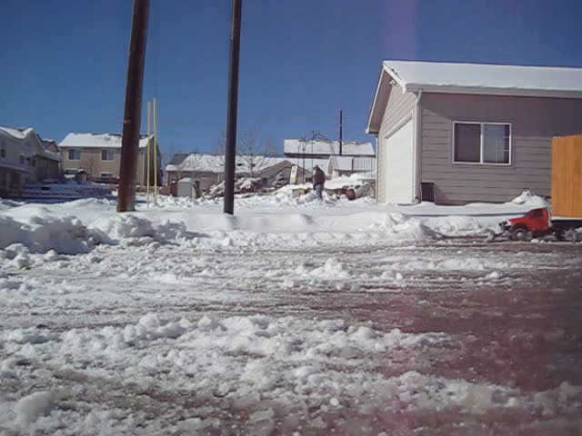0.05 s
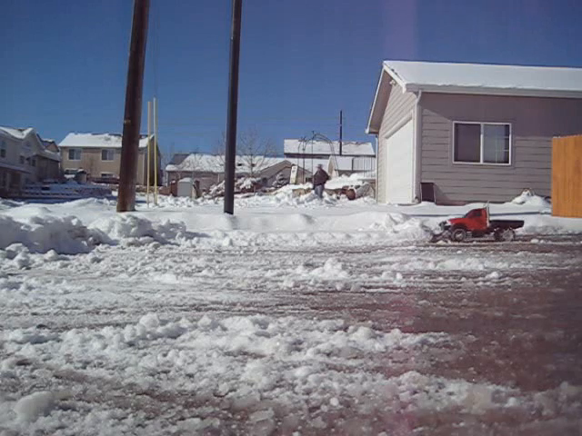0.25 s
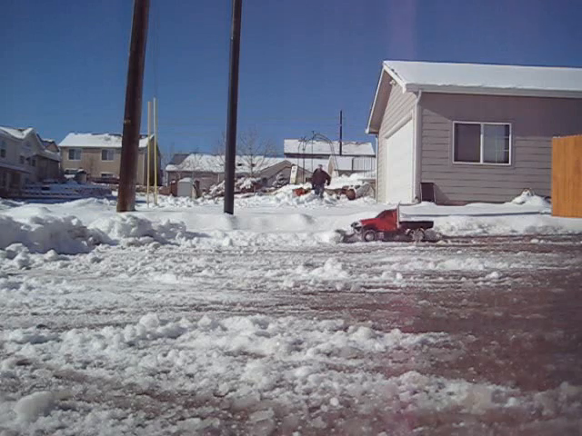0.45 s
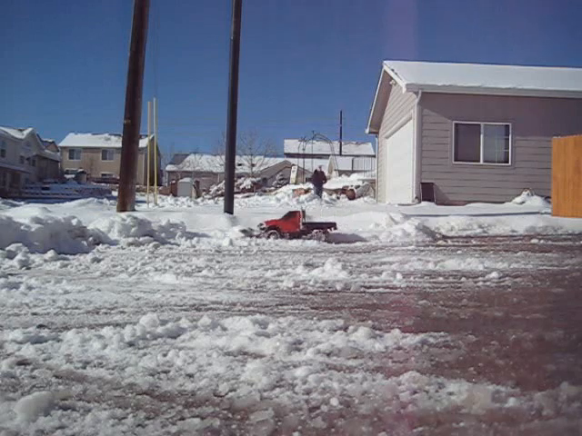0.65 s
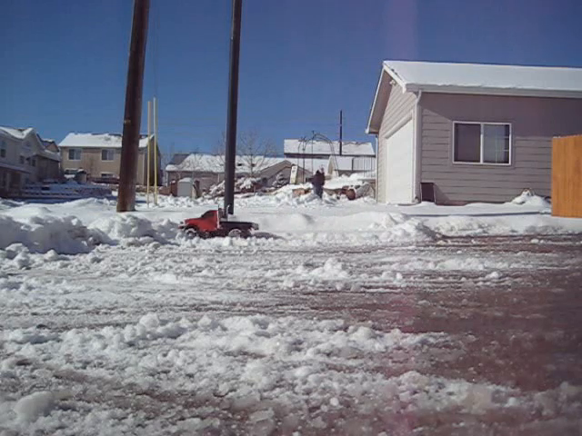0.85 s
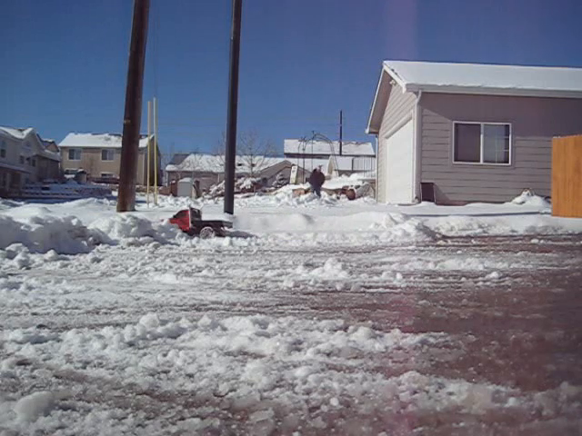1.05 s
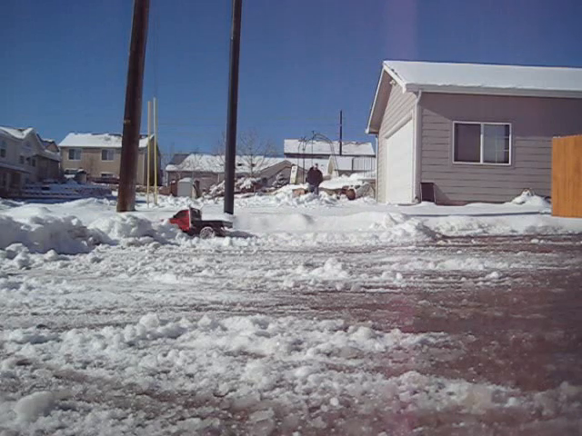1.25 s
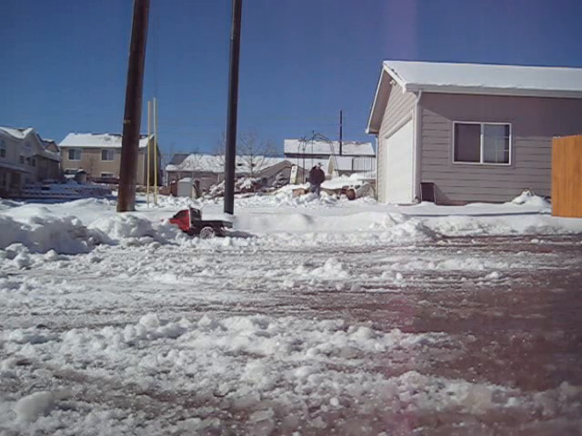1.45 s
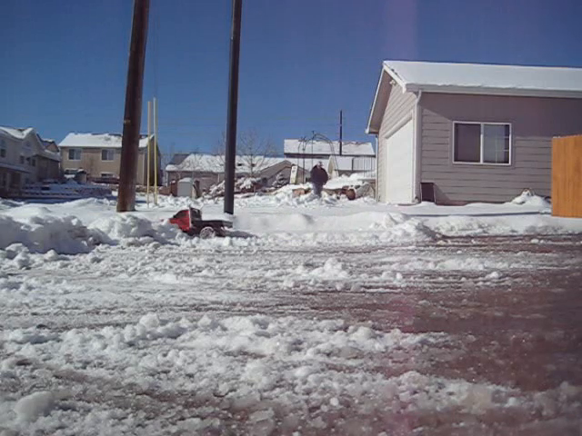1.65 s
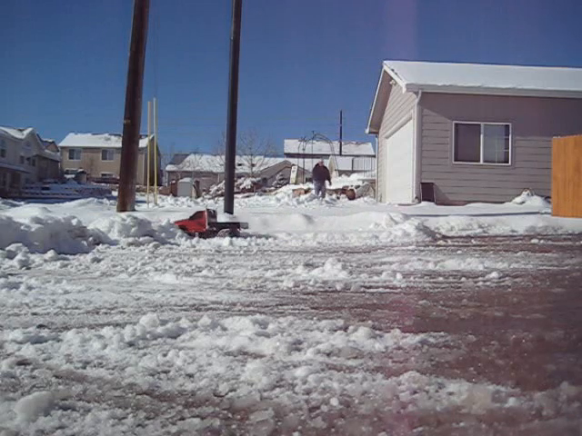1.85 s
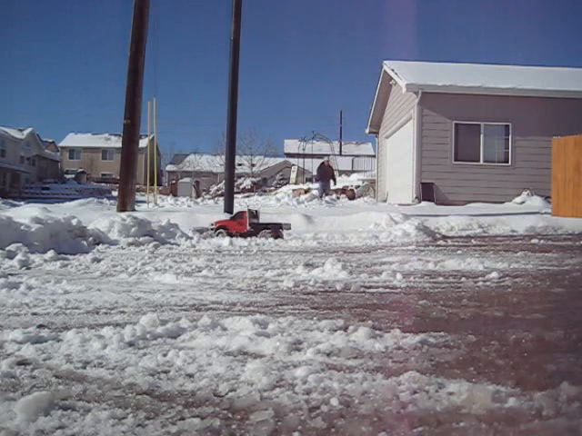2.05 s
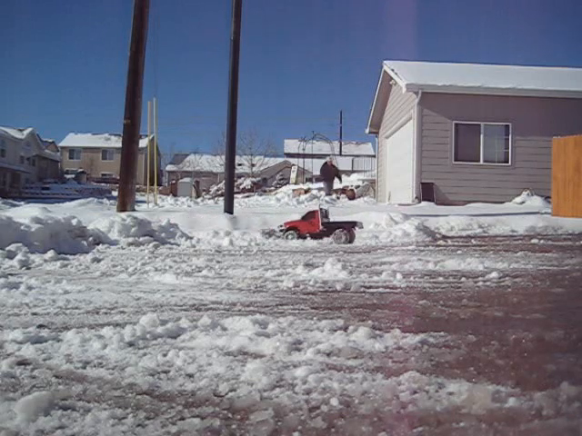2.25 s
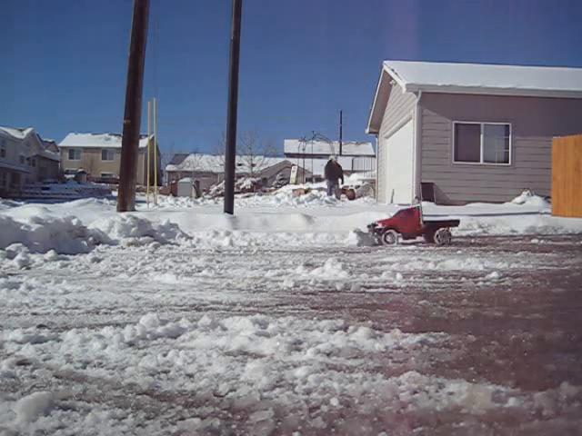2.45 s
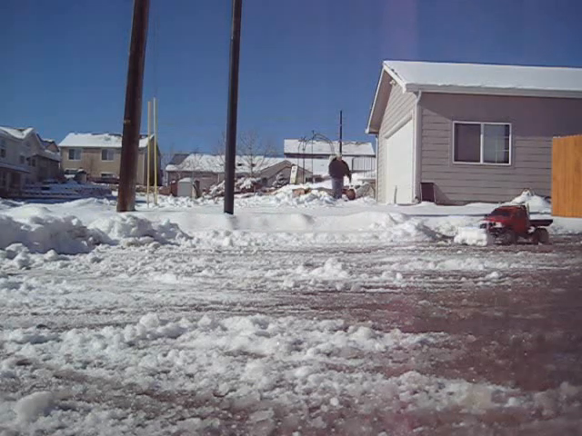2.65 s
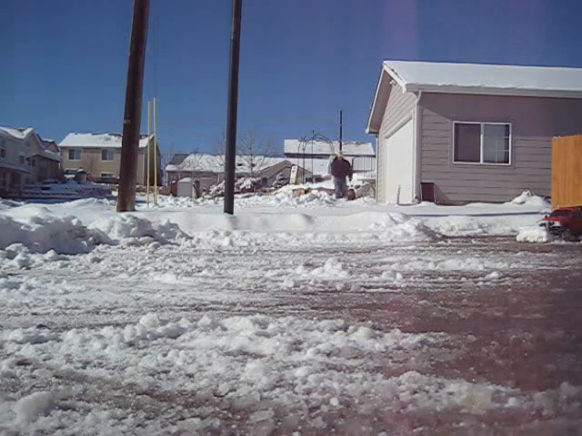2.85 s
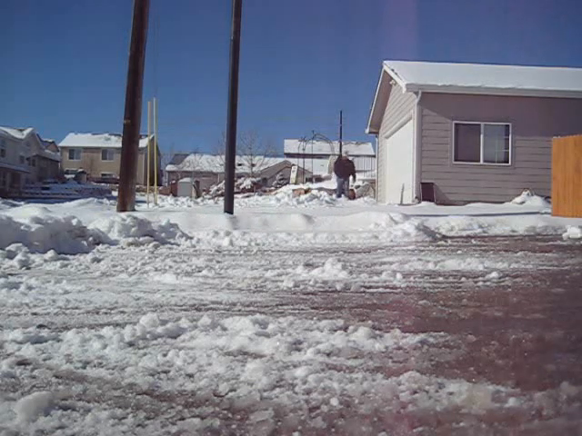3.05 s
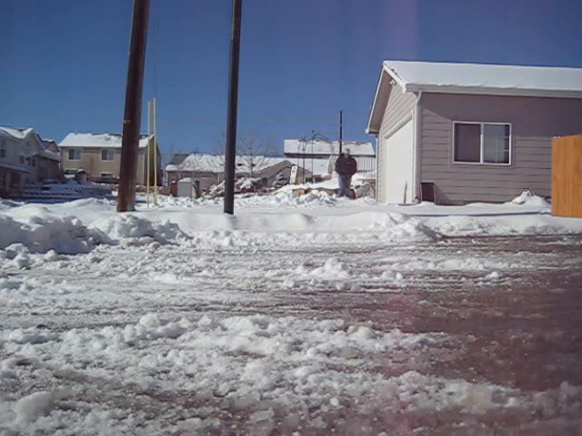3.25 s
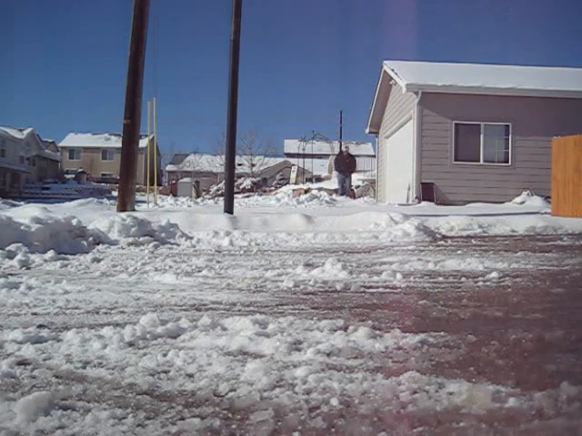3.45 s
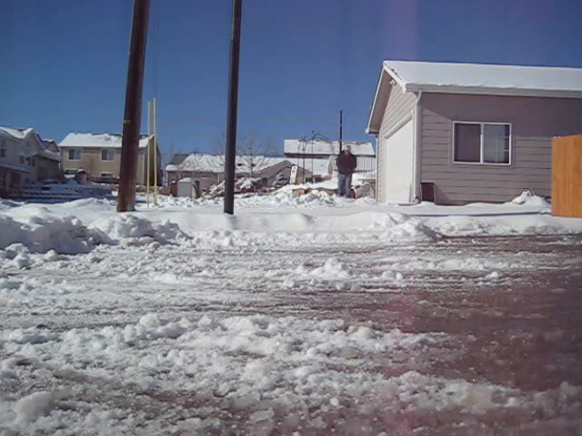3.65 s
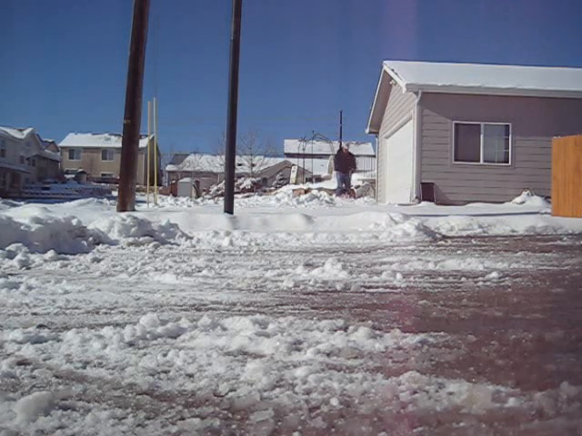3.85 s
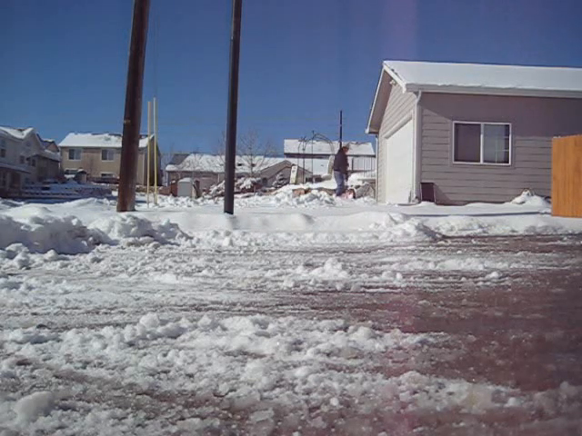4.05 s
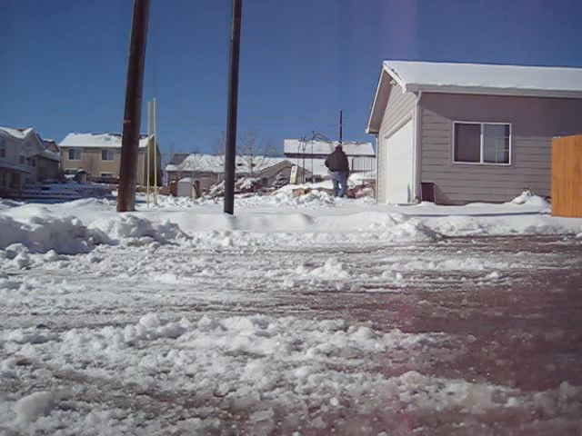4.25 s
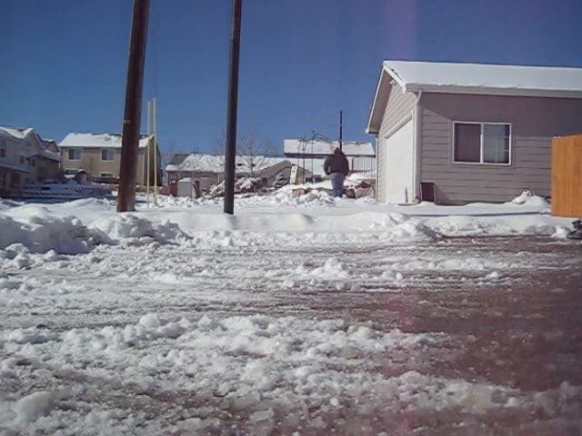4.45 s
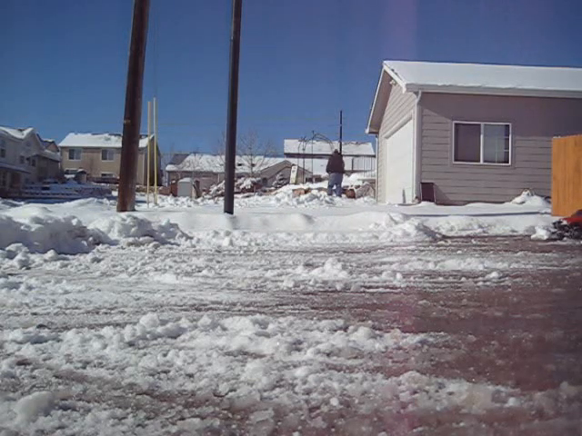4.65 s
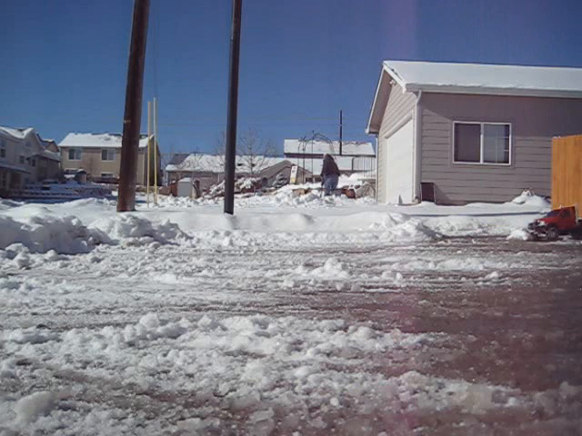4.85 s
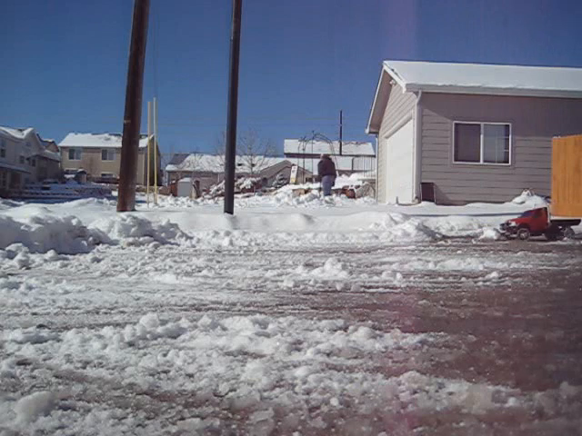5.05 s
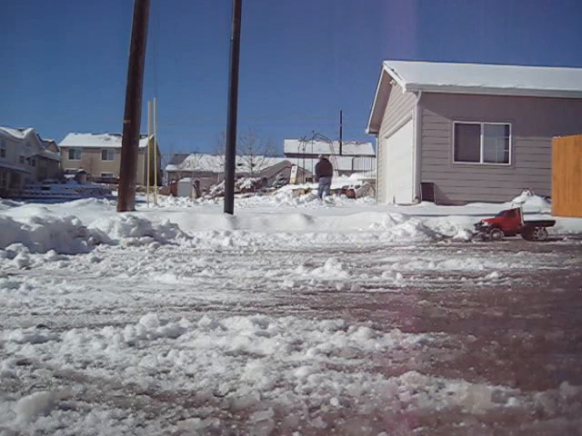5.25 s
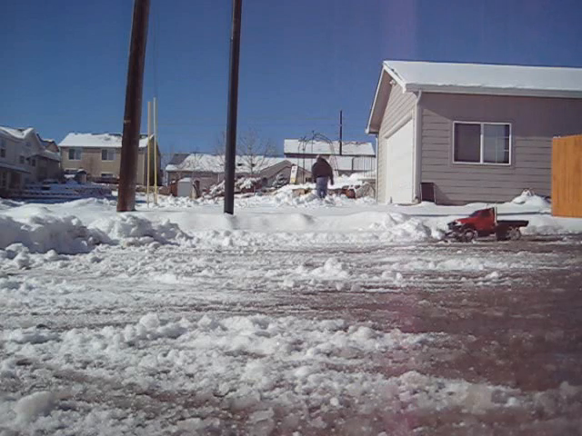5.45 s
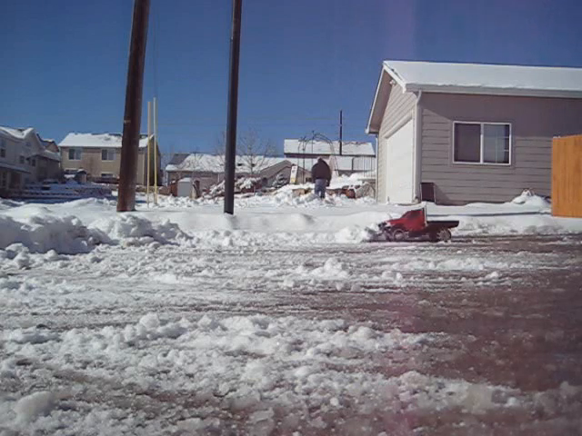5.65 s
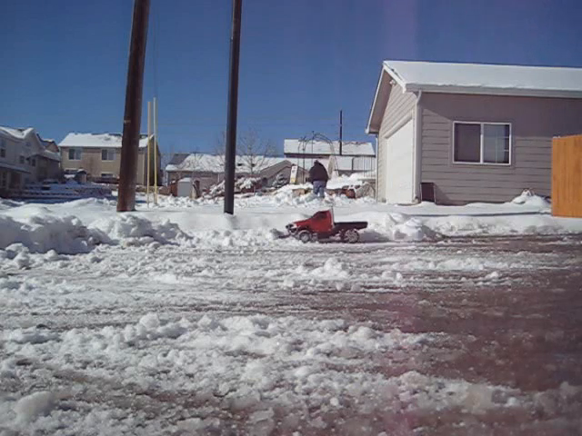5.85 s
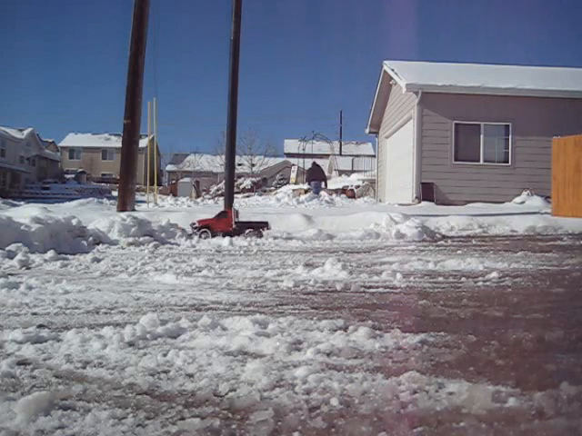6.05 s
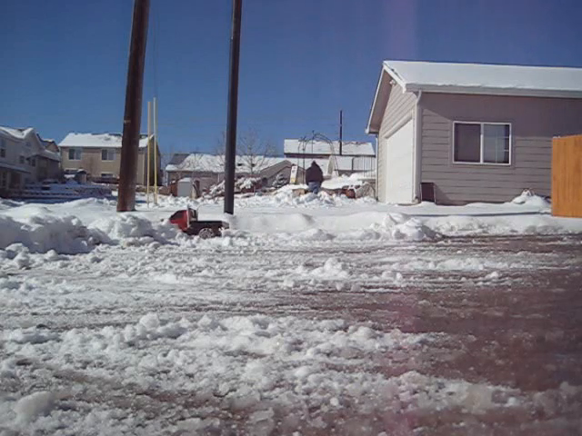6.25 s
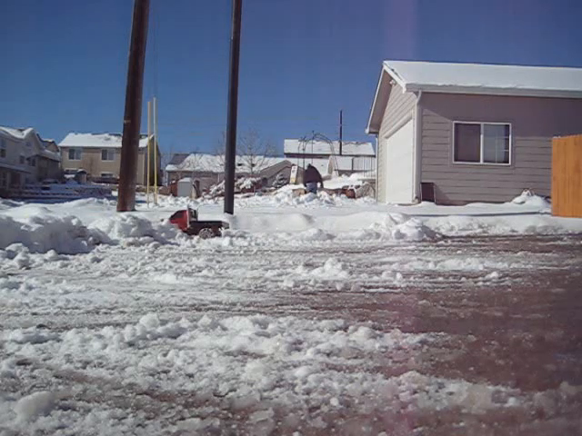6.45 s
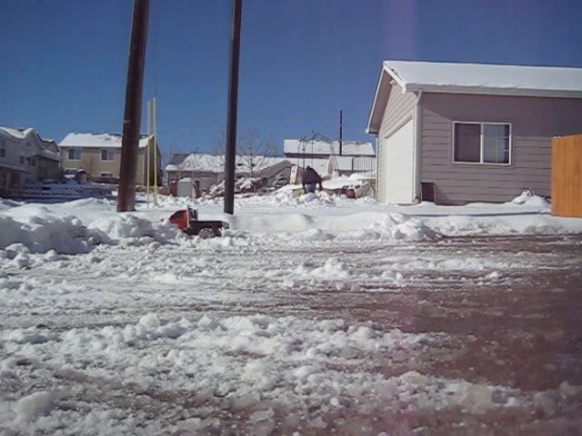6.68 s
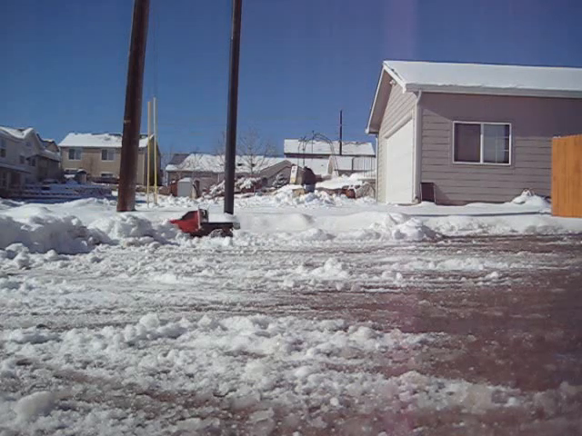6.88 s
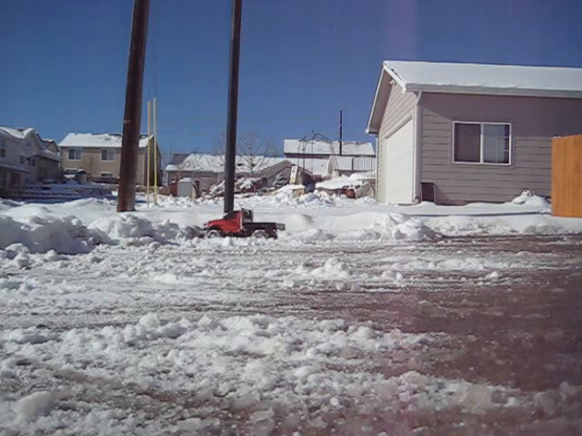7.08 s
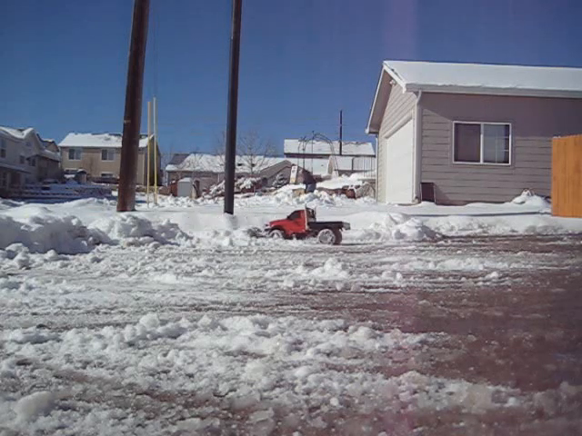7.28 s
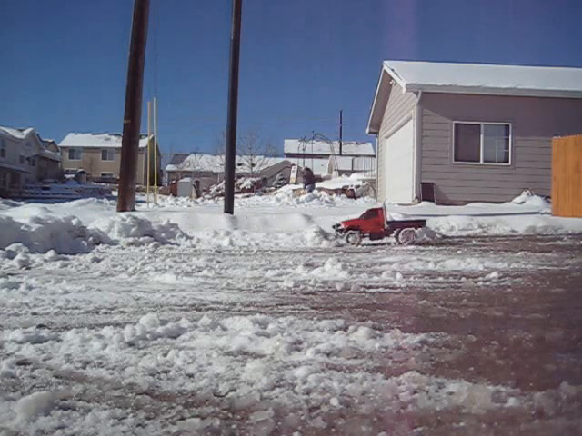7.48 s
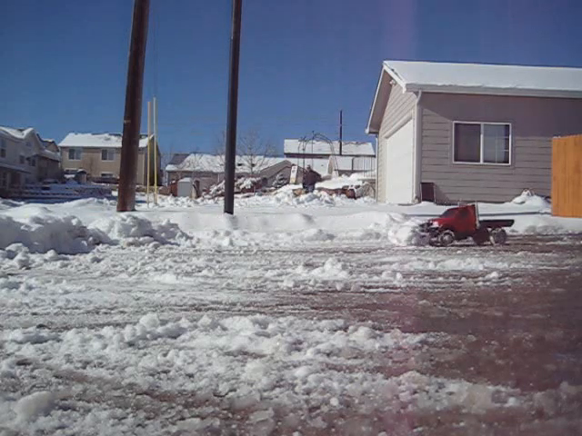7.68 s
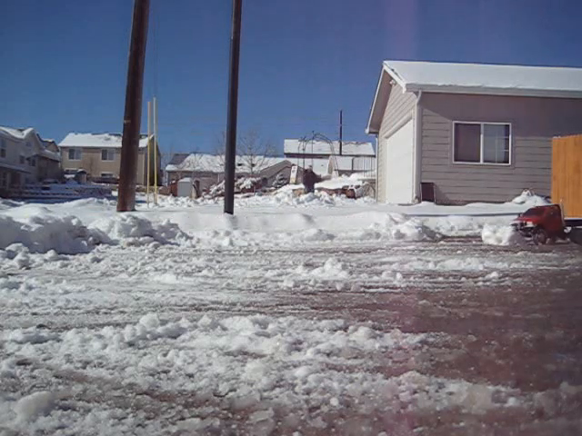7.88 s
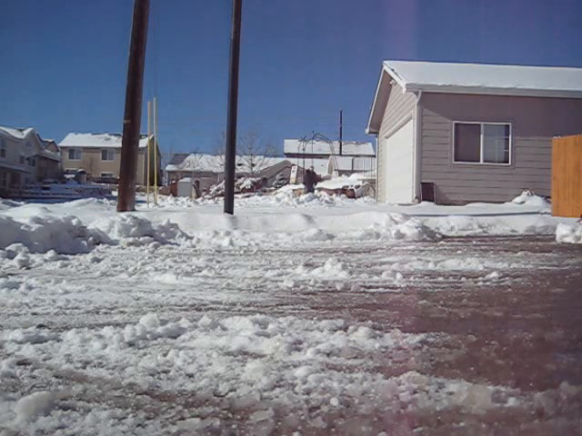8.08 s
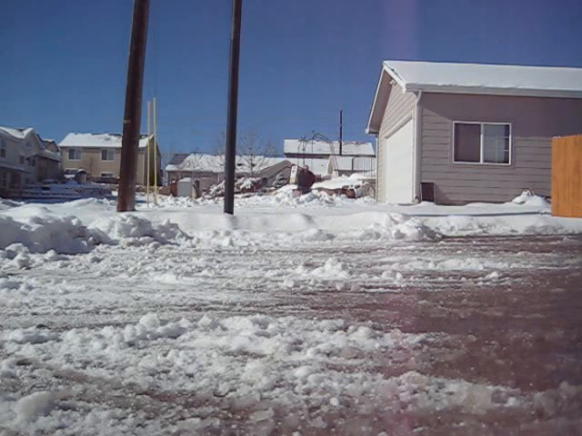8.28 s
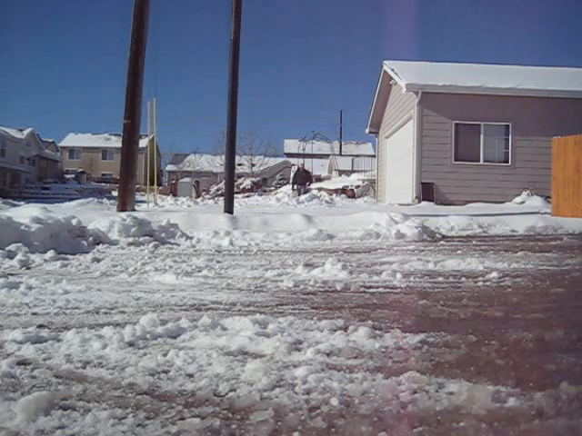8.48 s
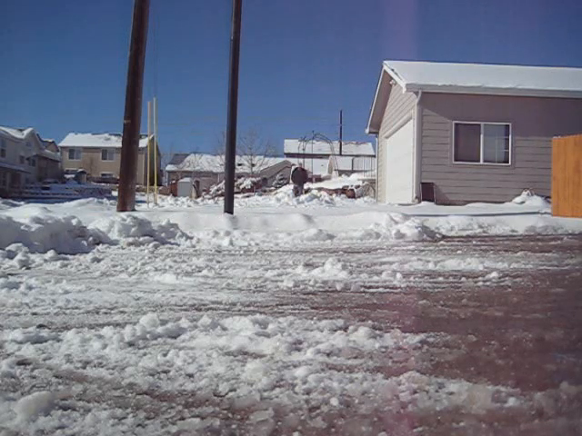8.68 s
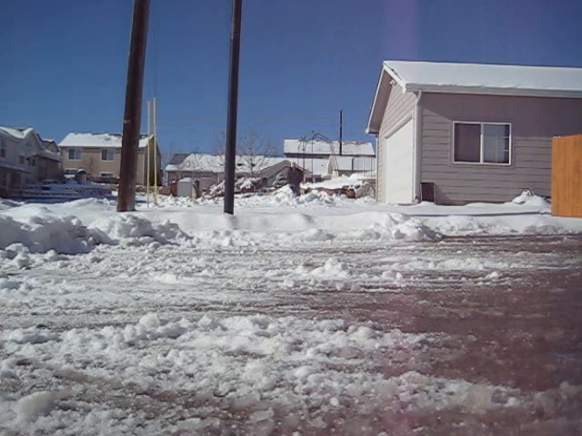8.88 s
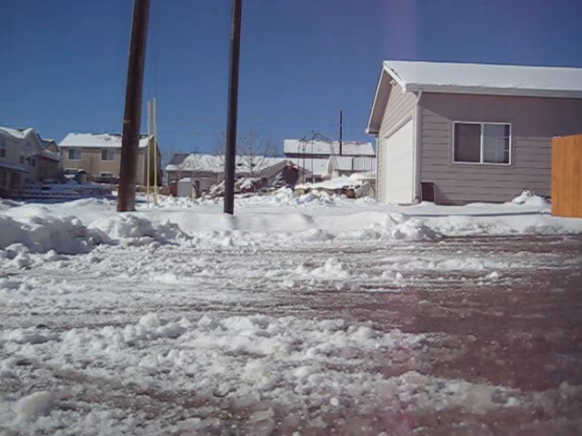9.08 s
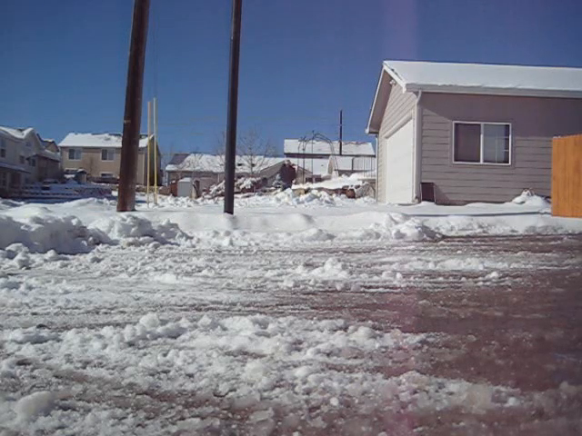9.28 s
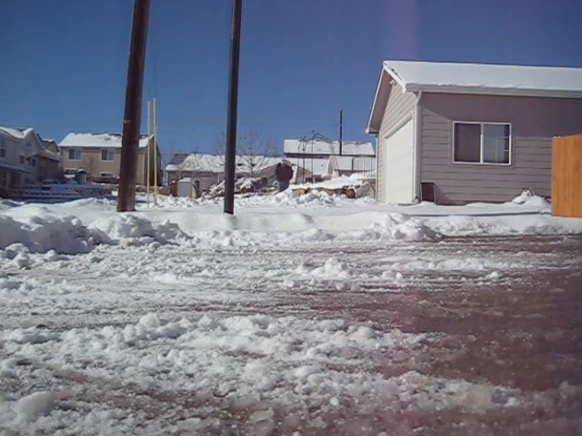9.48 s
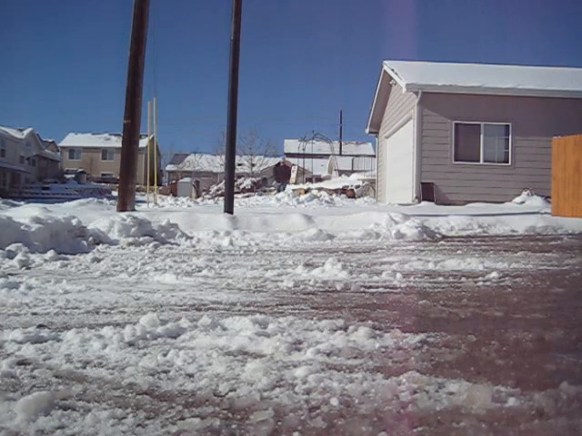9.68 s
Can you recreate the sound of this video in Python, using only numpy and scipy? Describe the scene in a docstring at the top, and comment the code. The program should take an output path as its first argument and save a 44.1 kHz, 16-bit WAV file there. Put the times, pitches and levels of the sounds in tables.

```python
"""One microphone in a yard, feeding both channels: a small electric model truck ploughs snow.
It drives from the garage to the snow bank, rests and reverses home, shuffles in short jerks close by,
then goes out and back again. Gear teeth rattle into the chassis; motor and gears whine with the speed.
Snow creaks in bursts of grain slips, ice and plastic tick as short noise puffs, slack gears clack.
Far traffic rumbles and drones throughout under shaped noise and microphone hiss."""
import sys
import numpy as np
from scipy import signal
from scipy.fft import rfft, irfft, next_fast_len
from scipy.io import wavfile
from scipy.ndimage import uniform_filter1d

SR = 44100
rng = np.random.default_rng(int(sys.argv[2]) if len(sys.argv) > 2 else 0)


def waveform_to_disk(signal):
    """Save audio, clipped to [-1, 1], as 16-bit WAV at the path in sys.argv[1]."""
    frames = np.transpose(np.atleast_2d(signal))
    scaled = np.clip(frames, -1, 1) * 32767
    samples = np.round(scaled).astype(np.int16)
    wavfile.write(sys.argv[1], SR, samples)


def voltage_ratio(decibels):
    """Convert decibels (scalar or array-like) to amplitude ratios, 20 dB per decade."""
    exponent = np.asarray(decibels, float) / 20
    return 10 ** exponent


N = 428641


def rms_one(x):
    """Scales to an rms of 1."""
    return x / np.sqrt(np.mean(x ** 2) + 1e-20)


def in_time(rows):
    """Straight lines through rows of time in seconds and values, one curve a column."""
    s, *columns = np.transpose(rows)
    return [np.interp(np.arange(N) / SR, s, column) for column in columns]


def at_hz(points, hz):
    """Reads a table of Hz and dB along log frequency."""
    table_hz, table_db = np.transpose(points)
    return np.interp(np.log(hz), np.log(table_hz), table_db)


def band(x, low, high, order=2):
    """Butterworth band-pass between two frequencies in Hz."""
    return signal.sosfilt(signal.butter(order, [low, high], "band", fs=SR, output="sos"), x)


def coloured(spectrum):
    """Smooth noise on a spectrum; rms 1."""
    size = next_fast_len(N)
    hz = np.maximum(np.fft.rfftfreq(size, 1 / SR), 1)
    colour = voltage_ratio(at_hz(spectrum, hz))
    return rms_one(irfft(rfft(rng.standard_normal(size)) * colour, size)[:N])


def drift(rate):
    """Slow chance: noise twice through a one-pole low-pass at rate Hz, run in for a second; rms 1."""
    r = np.exp(-2 * np.pi * rate / SR)
    noise = rng.standard_normal(N + SR)
    return rms_one(signal.lfilter([1], [1, -2 * r, r * r], noise)[SR:])


def resonances(x, table):
    """Parallel resonators of (Hz, width Hz, dB), signs alternating."""
    out = 0
    for k, (hz, width, level_db) in enumerate(table):
        r = np.exp(-np.pi * width / SR)
        top = (-1) ** k * voltage_ratio(level_db) * (1 - r * r) / 2
        out = out + signal.lfilter([top, 0, -top], [1, -2 * r * np.cos(2 * np.pi * hz / SR), r * r], x)
    return out


def grains(per_s, spread_db):
    """Random clicks of uneven size and sign."""
    sizes_db = spread_db * np.minimum(rng.exponential(1, N), 5)
    sizes = voltage_ratio(sizes_db) * rng.choice([-1, 1], N)
    return sizes * (rng.random(N) < per_s / SR)


def tone(hz, level_db, wobble_hz, rough):
    """A gliding sine; uneven teeth blur its strength and phase."""
    rough = np.clip(rough, 0, 1)
    blur = (drift(wobble_hz) + 1j * drift(wobble_hz)) / np.sqrt(2)
    carrier = np.exp(2j * np.pi * np.cumsum(hz) / SR)
    blurred = carrier * (np.sqrt(1 - rough) + np.sqrt(rough) * blur)
    return voltage_ratio(level_db) * np.sqrt(2) * np.real(blurred)


def drive():
    """Gear pitch and effort through all pulls of the throttle."""
    # One list a pull; speed is told by the axle gear.
    # Each row: time in seconds, gear pitch in Hz, effort in dB.
    pulls = [
        [(0, 850, -20.5), (.125, 860, -23.5), (.29, 936, -18), (.46, 1303, -16), (.62, 1345, -17),
         (.95, 1310, -20), (1.083, 1196, -38), (1.13, 1106, -47), (1.2, 599.6, -72)],
        [(1.68, 600, -66), (1.74, 649.5, -40), (1.786, 739, -32.5), (1.83, 876, -29), (1.9, 977, -26),
         (2.05, 1167, -22.5), (2.25, 1203, -21.5), (2.4, 1302, -17), (3.07, 1290, -19), (3.12, 1214, -18),
         (3.29, 1250, -18), (3.42, 1136, -20.5), (3.5, 780, -25), (3.59, 600, -30.5), (3.627, 400, -44)],
        [(3.655, 412, -41), (3.7, 417, -35), (3.75, 502, -31.5), (3.78, 610, -27.5), (3.82, 635, -28.5),
         (3.92, 890, -23), (3.98, 979, -23), (4.14, 1068, -22), (4.21, 1050, -27), (4.29, 947, -31),
         (4.352, 898, -27.5), (4.385, 493, -33.5), (4.49, 378, -38)],
        [(4.55, 373, -34.5), (4.56, 728, -31.5), (4.605, 707, -33), (4.63, 474, -31), (4.69, 535, -31),
         (4.72, 499, -31), (4.79, 598, -28), (5.05, 551, -28.5), (5.19, 507, -29), (5.35, 513, -27),
         (5.505, 484, -28.5)],
        [(5.545, 724, -20), (5.585, 1070, -17), (5.75, 1320, -16), (6.09, 1356, -19), (6.16, 1284, -24.5),
         (6.256, 1190, -33.5), (6.316, 1100, -56), (6.4, 500, -70)],
        [(6.84, 450, -67), (6.88, 459.5, -41), (6.91, 501, -36.5), (6.94, 850, -30.5), (7.07, 1100, -24.5),
         (7.19, 1197, -22), (7.33, 1010, -23.5), (7.46, 1225, -18), (7.66, 1238, -17.5), (7.78, 1135, -18.5),
         (8.13, 1150, -20), (8.22, 1050, -21.5), (8.3, 1146, -22), (8.56, 1138, -22), (8.7, 900, -25.5),
         (8.865, 696, -36), (8.98, 502, -48.5), (9.2, 400, -59)],
    ]
    return in_time([row for pull in pulls for row in pull])


def lane_place():
    """Where the truck is on the lane, from the garage to the snow bank."""
    # Each row: time in seconds, place (0 close by the garage, 1 far off at the bank).
    way = [(0, 0.041), (.35, 0.29), (.95, 1), (2.1, 0.87), (2.45, 0.47), (2.9, -0.086), (3.45, -.1),
           (3.7, .3), (4.2, -0.26), (4.7, 0.065), (5.55, 0.17), (6.1, 0.88), (7.1, 0.95), (7.55, 0.49),
           (8.05, -0.12), (8.8, -0.15)]
    return in_time(way)[0]


def share(close_db, bank_db, octave_db):
    """Level of a part in dB: effort, changed by the truck's place and speed."""
    gear_hz, effort_db = drive()
    octaves = np.log2(gear_hz / 1300)   # from full speed
    return effort_db + close_db + bank_db * lane_place() + octave_db * octaves


def throb():
    """The load on the teeth swells once a shaft turn and jumps over bumps."""
    shaft_ratio = 10.1   # whine cycles per turn of the shaft
    turns = np.cumsum(drive()[0]) / SR / shaft_ratio
    bumps_db = 0.31 * drift(20.0) + 0.68 * drift(155.0)
    return voltage_ratio(1.1 * np.sin(2 * np.pi * turns) + bumps_db)


def rattle(load):
    """Dense tooth blows ring in the chassis; each part passes its own band."""
    # Plough blade, wheels, tyres, chassis, gearbox, cab, motor can: the band each radiates.
    # Each row: low edge in Hz, high edge in Hz.
    parts = [(600, 1000), (1000, 1500), (1500, 2330), (2330, 4500), (4500, 8000), (8000, 11500),
             (11500, 19000)]
    # The same parts' levels. Each row: level over effort close by in dB, change out to the bank in dB,
    # change in dB per octave of speed.
    part_levels = [(-32, -2, -3.5), (-23, 5, -5.5), (-19, 6, -3), (-12, 6.5, -0.5), (-9, -3, -2.5),
                   (-6, -9.5, -1.5), (-10.5, -14, -1)]
    # Resonances the blows ring in. Each row: centre in Hz, width in Hz, relative level in dB.
    chassis = [(1150, 40, -14), (2457, 91, 10.5), (3190, 1530, 8.5), (6940, 2100, 5.5), (10100, 310, -8.5)]
    crawling = np.clip((-22. - drive()[1]) / 8, 0, 1)   # at a crawl the teeth catch in lumps
    lumps = voltage_ratio(1.4 * crawling * drift(29.0))
    blows = load * lumps * grains(12000., spread_db=3.0)
    body = blows + 2.22 * resonances(blows, chassis)
    out = 0
    for (low, high), levels in zip(parts, part_levels):
        level_db = share(*levels) + 0.91 * drift(15.0)
        out = out + voltage_ratio(level_db) * rms_one(band(body, low, high, order=4))
    return out


def gears(load):
    """Axle gear, pinion and motor sing at fixed ratios of one speed; housings ring where they are."""
    # How well whine, pinion and whistle carry. Each row: pitch in Hz, level over effort in dB.
    whine_carry = [(800, -42), (1000, -36), (1090, -24), (1150, -17.5), (1220, -14.5), (1350, -17)]
    pinion_carry = [(1450, -10), (1800, -5), (2150, -6), (2650, -8), (3200, -16), (3700, -12), (4300, -30)]
    whistle_carry = [(7500, -35), (9500, -20), (10300, -0.5), (11200, -14), (12300, -7), (13200, -11.5),
                     (13900, -27)]
    # A third of the whine hums for a while: start in seconds, end in seconds, level over effort in dB.
    start, end, under_db = (2.1, 3.14, -39)
    # Ring of the motor can. Each row: time in seconds, level over effort in dB.
    can_ring = [(.3, -37), (.42, -15), (1.0, -13.5), (1.75, -7.5), (2.1, -10.5), (2.9, -9), (3.35, -8),
                (3.5, -35), (5.6, -35), (5.72, -13), (6.2, -13), (6.95, -11), (7.4, -15), (7.7, -16),
                (8.0, -19), (8.7, -18)]
    # Housing and two gearbox rings. Each row: pitch close by in Hz, pitch at the bank in Hz, width in Hz,
    # extra dB per dB of effort, level over effort close by in dB, change out to the bank in dB,
    # change in dB per octave of speed.
    rings = [(3100, 2950, 120, 0.5, -21, 8.5, -6), (6830, 7050, 360, 1.1, -8.5, 1, 13),
             (5167, 5750, 430, 0.24, -12, 4, 11)]
    gear_hz, effort_db = drive()
    place, t = lane_place(), np.arange(N) / SR
    unsteady = .008 * drift(10.)
    patchy = load * voltage_ratio(0.63 * drift(6.5))   # wheels slip and grip

    # coasting teeth carry no load; hard braking (12 octaves per second or more) is no coasting
    slowing = -uniform_filter1d(np.gradient(np.log2(gear_hz)) * SR, size=2000)   # octaves per second
    coast_db = -14 * np.clip(slowing / 2.5, 0, 1) * (slowing < 12)

    whine = gear_hz * (1 + unsteady / 2)
    whine_effort_db = np.minimum(effort_db, -24.5)   # beyond this the whine stops growing
    whine_db = whine_effort_db + coast_db + at_hz(whine_carry, gear_hz) + 5.5 * place
    out = tone(whine, whine_db, wobble_hz=22., rough=.2)
    out += tone(2 * whine, whine_db + 0.5, wobble_hz=60., rough=0.82)
    undertone = tone(whine / 3, effort_db + under_db, wobble_hz=5., rough=0.12)
    out += ((t > start) & (t < end)) * undertone

    pinion = 3.6 * gear_hz
    stutter = .025 * drift(25.)
    pinion_effort_db = np.minimum(effort_db, -30)   # the pinion stops growing earlier
    pinion_db = pinion_effort_db + coast_db + at_hz(pinion_carry, pinion)
    pinion_tone = tone(pinion * (1 + stutter), pinion_db, wobble_hz=120., rough=.45)
    out += load * voltage_ratio(1.0 * drift(20.)) * pinion_tone

    whistle = 10.8 * gear_hz
    whistle_db = effort_db + at_hz(whistle_carry, whistle) - 5 * place
    out += patchy * tone(whistle * (1 + unsteady), whistle_db, wobble_hz=450., rough=1)
    can_db = effort_db + in_time(can_ring)[0]
    out += patchy * tone(13000 * (1 + unsteady), can_db, wobble_hz=450., rough=0.97)

    for close_hz, bank_hz, width_hz, growth, *levels in rings:
        hz = (close_hz + (bank_hz - close_hz) * place) * (1 + .015 * drift(3.0))
        extra_db = growth * (np.maximum(effort_db, -35.) + 18)   # none at -18 dB of effort
        ring = tone(hz, share(*levels) + extra_db, wobble_hz=width_hz, rough=0.95)
        out += voltage_ratio(1.7 * drift(12.0)) * load * ring
    return out


def peeps():
    """Thin, slightly blurred tones of steady pitch near standstill."""
    # Each row: start in seconds, length in seconds, pitch in Hz, level in dB.
    peep_rows = [(3.616, .13, 3930, -45), (6.36, .1, 9150, -63)]
    t, out = np.arange(N) / SR, 0
    for s, length, hz, level_db in peep_rows:
        peep = tone(np.full(N, hz), level_db, wobble_hz=25., rough=0.38)
        out = out + ((t > s) & (t < s + length)) * peep
    return out


def clacks(t60=0.016, rise=0.0012):
    """Slack in the gears is taken up: a soft blow on one mode of the gear housing."""
    # Each row: start in seconds, approximate peak in dB, pitch in Hz.
    clack_rows = [(1.774, -22, 2500), (1.797, -25, 2600), (3.5663, -19, 2860), (5.5336, -19, 2570),
                  (6.9492, -18.5, 2448)]
    out, t = np.zeros(N + 8192), np.arange(8192) / SR
    for s, peak_db, hz in clack_rows:
        shape = (1 - np.exp(-t / rise)) * voltage_ratio(-60 * t / t60 + 10)   # 10 dB makes up for the soft rise
        out[round(s * SR):][:t.size] += voltage_ratio(peak_db) * shape * np.sin(2 * np.pi * hz * t)
    return out[:N]


def crackle():
    """Ice breaks under the tyres and settles at rest; it stops growing once the truck rolls."""
    rolling_db = np.clip(drive()[1], -46., -29.)
    breaks = band(grains(50., spread_db=4.5), 2000, 12000, order=1)
    return voltage_ratio(rolling_db + 9.0) * breaks


def crunch():
    """Snow packs down with a creak: quick uneven slips between grains ring in the packed snow."""
    # Each row: start in seconds, length in seconds, level before the final band-pass in dB.
    creaks = [(0.179, 0.031, -42), (4.824, .03, -35.5), (4.867, 0.032, -36.5), (4.932, 0.058, -34),
              (5.025, 0.047, -37), (5.107, 0.028, -37), (5.192, 0.033, -36.5), (6.43, 0.027, -41.5),
              (6.49, 0.14, -44.5), (6.66, 0.13, -43), (6.746, .034, -29.5), (6.781, 0.038, -38),
              (8.834, 0.019, -41), (8.921, 0.072, -40)]
    # Resonances of the packed snow. Each row: centre in Hz, width in Hz, relative level in dB.
    snow = [(855, 225, 5), (1360, 240, 2), (1760, 150, 1), (2500, 810, -6.5), (5000, 6000, -15.5)]
    t, weight = np.arange(N) / SR, np.zeros(N)
    for s, length, level_db in creaks:
        weight += voltage_ratio(level_db) * ((t > s) & (t < s + length))
    slips = grains(2500., spread_db=2.5)
    ringing = band(resonances(weight * slips, snow), 720, 12000, order=3)
    return ringing / np.std(resonances(slips, snow))


def ticks(t60=0.012, tail_t60=0.25, rise=.0006):
    """Ice and plastic snap: a noise puff dies fast, wide around its centre, with a faint tail off walls."""
    # Each row: start in seconds, peak in dB, centre in Hz.
    tick_rows = [(0.134, -8, 10800), (0.3714, -4, 6850), (1.3285, -33, 5670), (1.4556, -31.5, 7000),
                 (1.589, -25.5, 8600), (3.5664, -12, 9980), (3.5794, -13, 6114), (4.343, -16, 9490),
                 (4.352, -16, 6760), (4.448, -18, 11800), (4.4987, -15, 10000), (4.655, -7, 7000),
                 (4.671, -13, 7550), (4.8048, -14.5, 4050), (4.8517, -16, 8250), (6.558, -24, 13000),
                 (6.896, -23, 4290), (6.9154, -14.5, 5500), (8.8595, -18, 6340), (9.2802, -20, 4190),
                 (9.2868, -15, 3900), (9.4878, -22, 9850), (9.497, -22, 11470), (9.5367, -21.5, 14700),
                 (9.631, -28, 4740), (9.7092, -23.5, 4150)]
    size = 4096
    out, t = np.zeros(N + size), np.arange(size) / SR
    decay = voltage_ratio(-60 * t / t60) + 0.14 * voltage_ratio(-60 * t / tail_t60)
    for s, peak_db, hz in tick_rows:
        puff = rng.standard_normal(size) * (1 - np.exp(-t / rise)) * decay
        around_centre = band(puff, hz / 1.6, min(hz * 1.5, 18000), order=1)
        puff = .3 * band(puff, 1200, 16000) + around_centre
        out[round(s * SR):][:size] += voltage_ratio(peak_db) * puff / np.abs(puff).max()
    return out[:N]


def yard():
    """Smooth noise on the far spectrum; passing traffic swells the bass and a wavering hum."""
    # Spectrum of the far yard. Each row: frequency in Hz, relative density in dB per Hz.
    far_spectrum = [(15, -52), (25, -19), (104, -9), (188, -3.5), (227, -5), (322, -4.5), (523, -10.5),
                    (631, -13), (945, -13), (1110, -44), (2230, -15.5), (11500, -29), (15500, -17.5)]
    # Air and microphone. Each row: frequency in Hz, relative density in dB per Hz.
    hiss_spectrum = [(600, -21), (950, -2.5), (1600, 0), (2300, -3.5), (4000, -12.5), (8000, -12),
                     (15500, -9)]
    # Far road. Each row: time in seconds, rumble in dB, drone in dB.
    traffic = [(0, -57.5, -50), (1.1, -61.5, -52), (2.03, -52.5, -52), (2.3, -61, -56),
               (3.39, -56.5, -52.5), (3.7, -61.5, -58), (7.8, -60.5, -53), (9.72, -64, -56)]
    far = coloured(far_spectrum)
    rumble_db, drone_db = in_time(traffic)
    rumble = voltage_ratio(rumble_db) * rms_one(band(far, 29, 160))
    drone = voltage_ratio(drone_db) * rms_one(band(far, 225.0, 504, order=3))
    hum_phase = 2 * np.pi * 276 * np.arange(N) / SR + .5 * drift(2.5)   # 276 Hz, wavering
    hum = voltage_ratio(drone_db - 7.5 + 1.8 * drift(2.2)) * np.sin(hum_phase)
    hiss = voltage_ratio(-45 + 0.44 * drift(24.0)) * coloured(hiss_spectrum)
    return voltage_ratio(-43) * band(far, 700, 12000, order=3) + rumble + drone + hum + hiss


def scene():
    """Truck, snow and yard at one microphone, alike in both channels."""
    load = throb()
    truck = rattle(load) + gears(load) + peeps() + clacks() + crackle()
    return np.tile(truck + crunch() + ticks() + yard(), (2, 1))


def low_pass(x):
    """Removes everything above the highest recorded frequency."""
    return signal.sosfilt(signal.butter(12, 16690, fs=SR, output="sos"), x)


def record(dry):
    """Peaks are rounded, the top is cut off sharply at 15.5 kHz."""
    size = next_fast_len(N)
    rounded = .9 * np.tanh(dry / .9)
    passed = np.fft.rfftfreq(size, 1 / SR) < 15500
    mix = irfft(rfft(rounded, size) * passed, size)[:, :N]
    return low_pass(mix)


dry = scene()
out = record(dry)
waveform_to_disk(out)
```